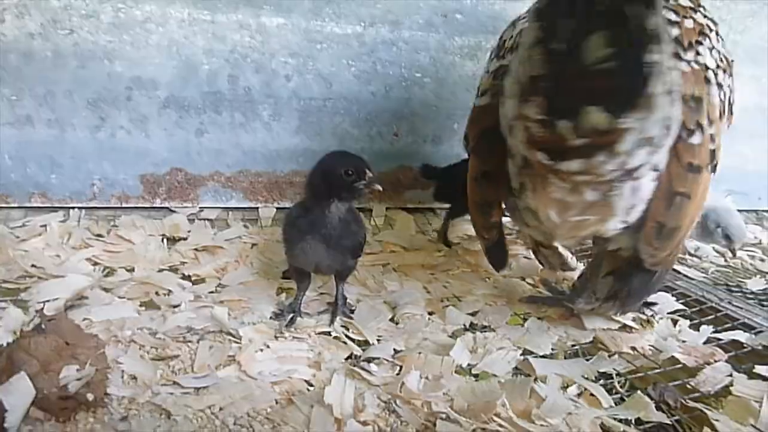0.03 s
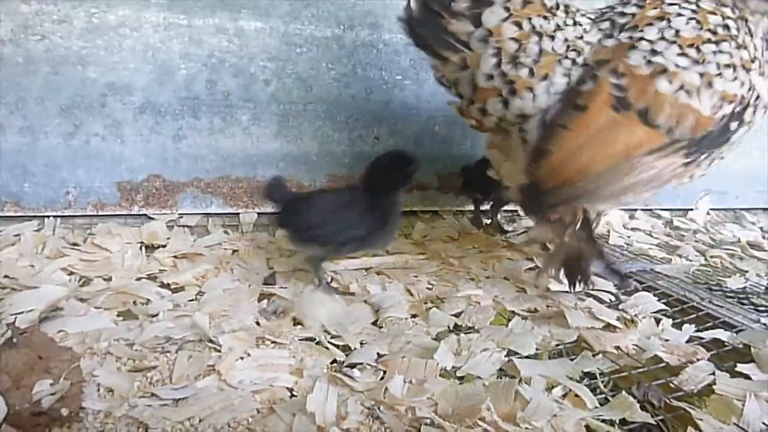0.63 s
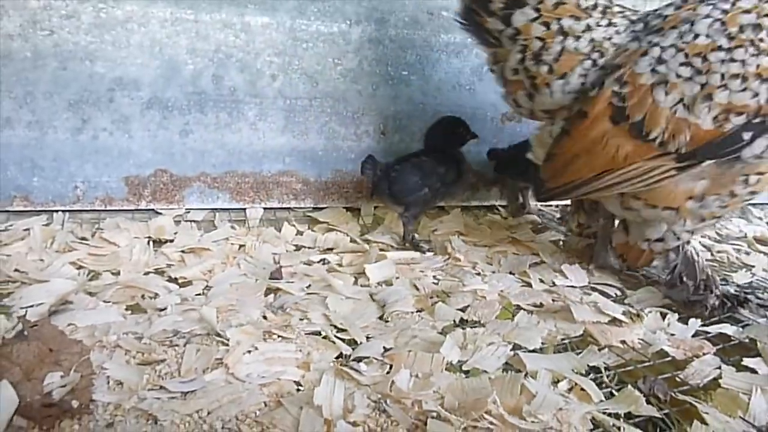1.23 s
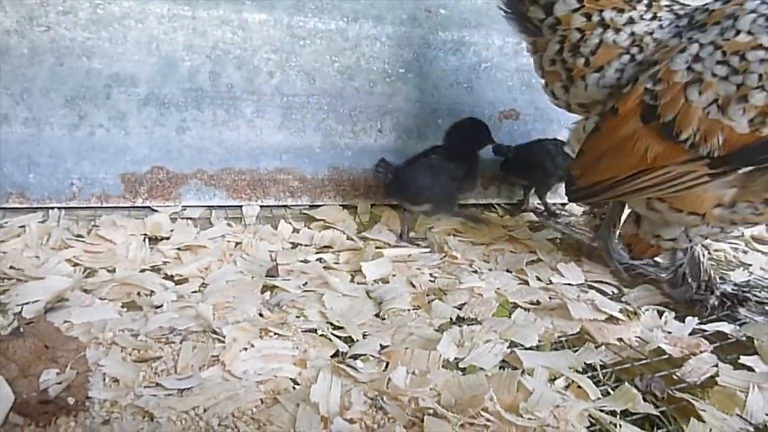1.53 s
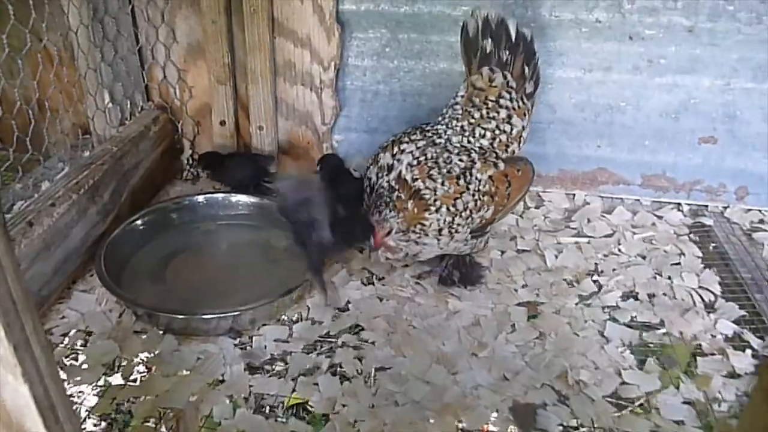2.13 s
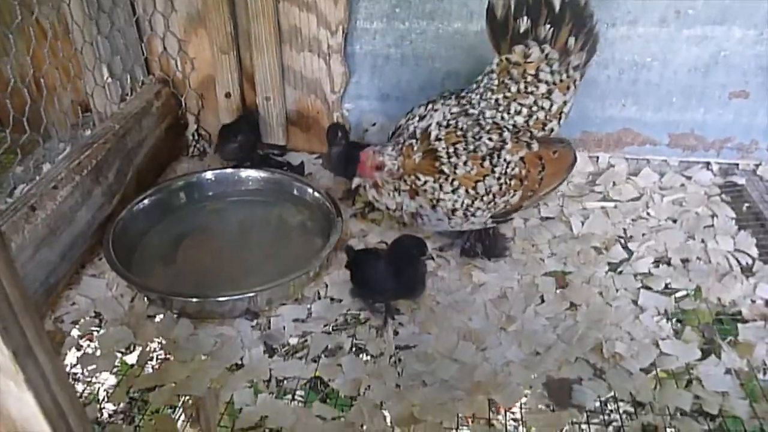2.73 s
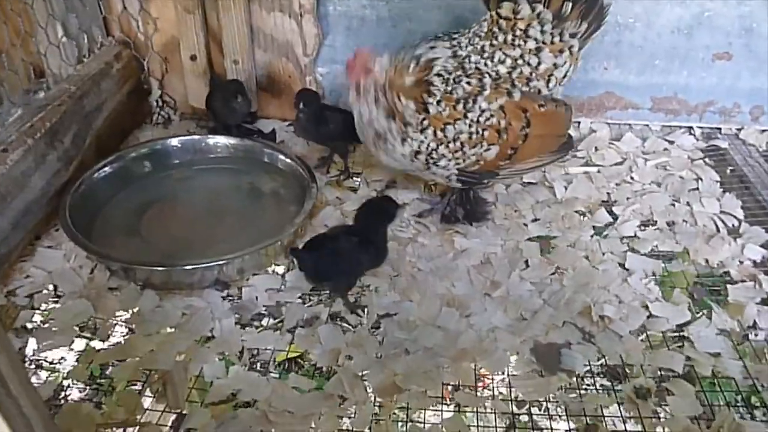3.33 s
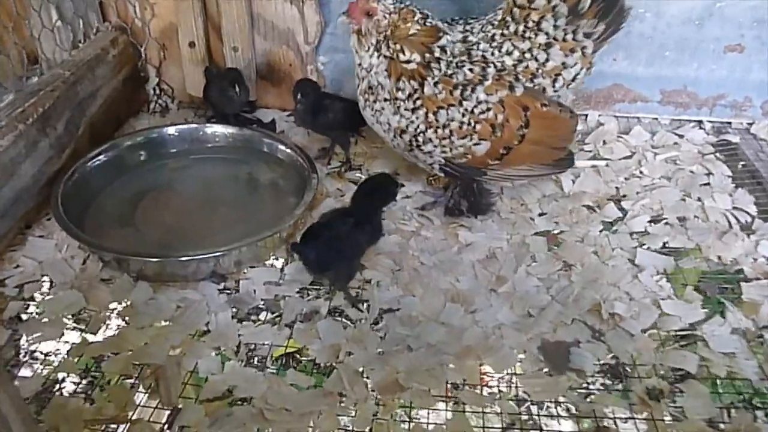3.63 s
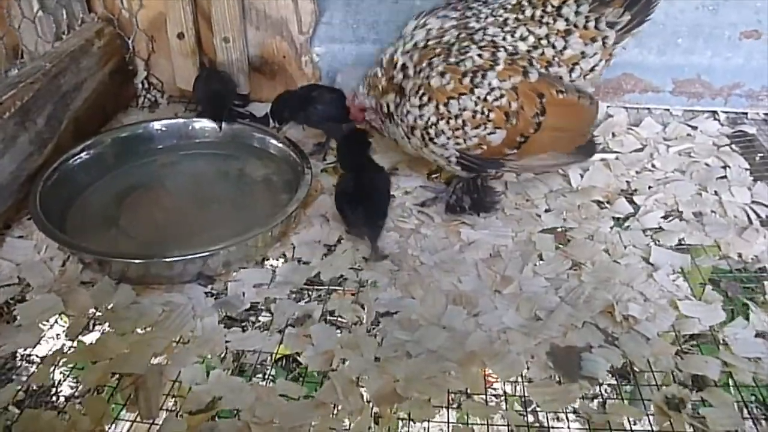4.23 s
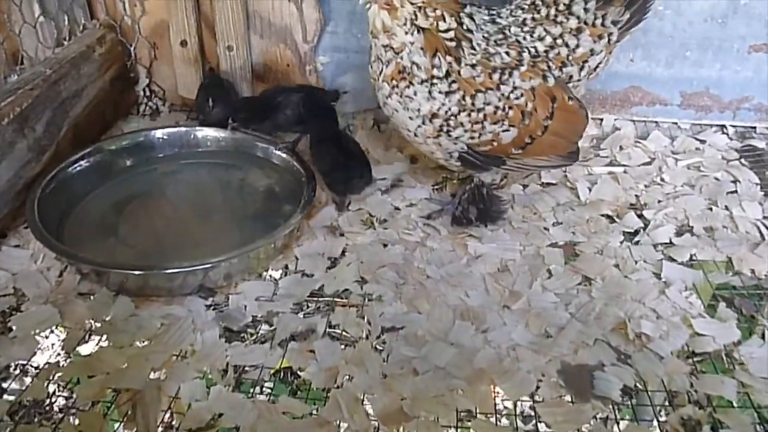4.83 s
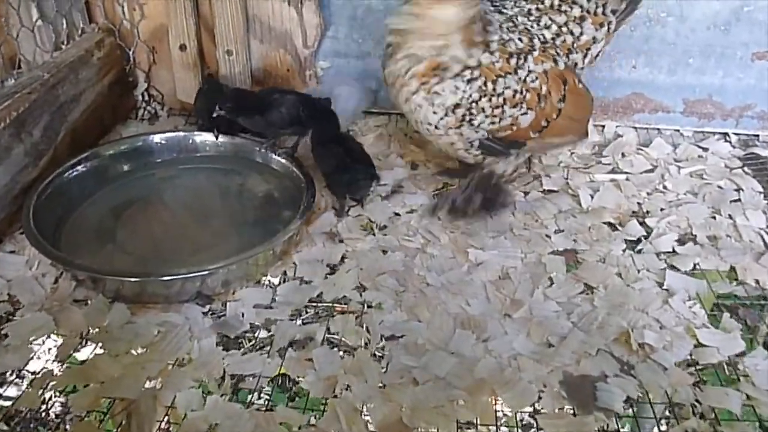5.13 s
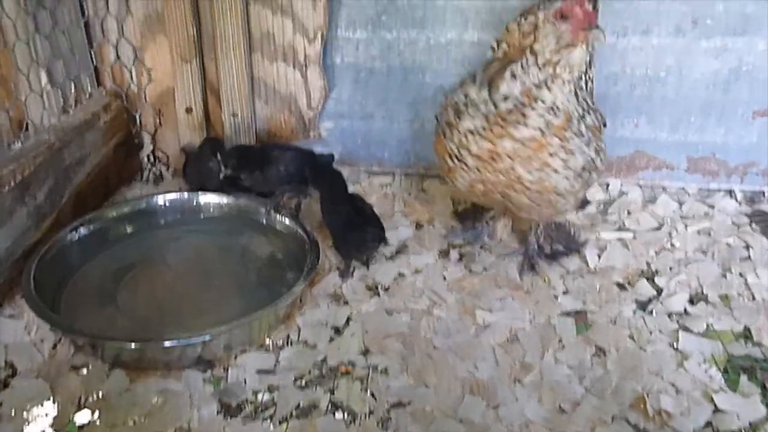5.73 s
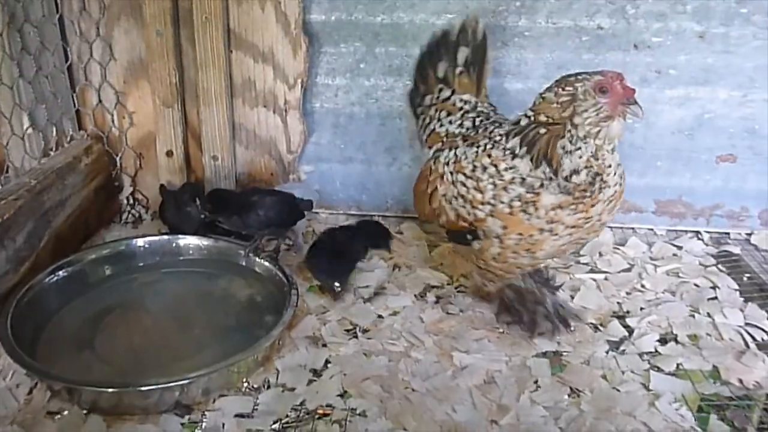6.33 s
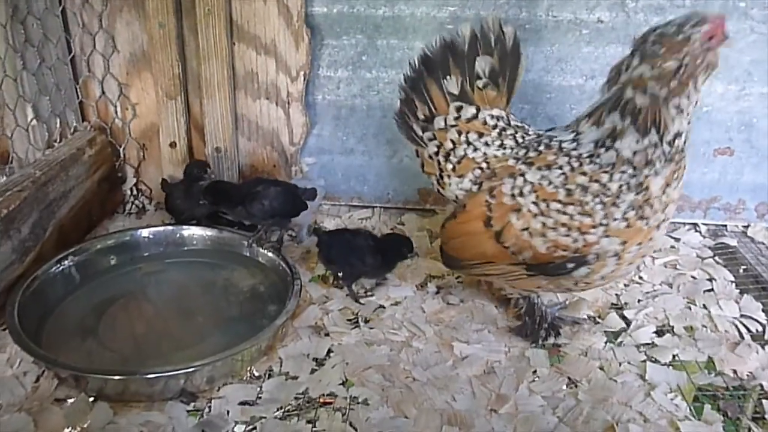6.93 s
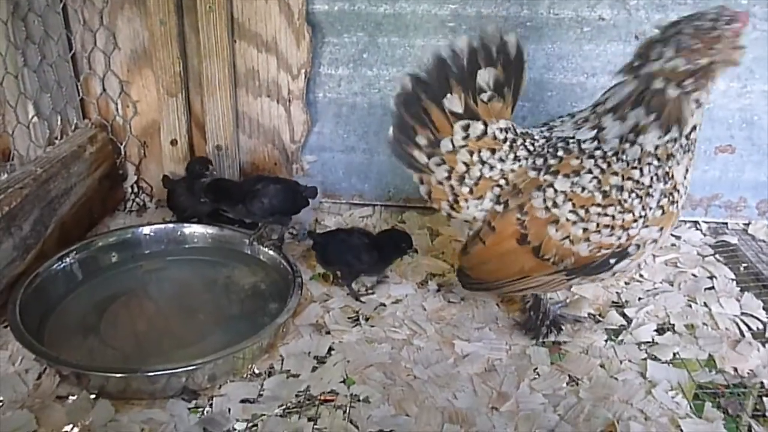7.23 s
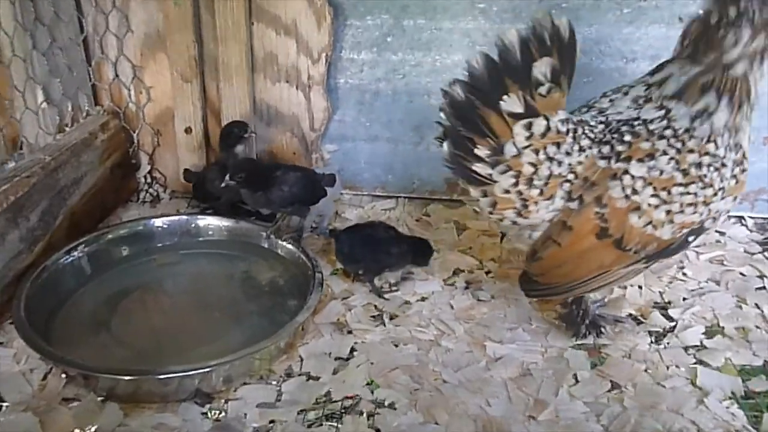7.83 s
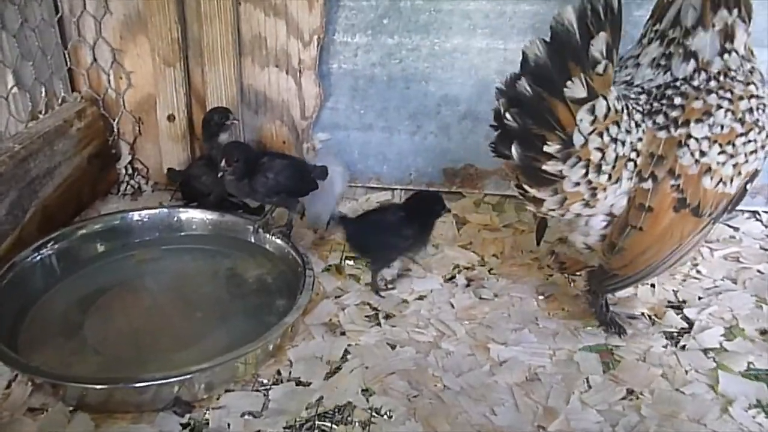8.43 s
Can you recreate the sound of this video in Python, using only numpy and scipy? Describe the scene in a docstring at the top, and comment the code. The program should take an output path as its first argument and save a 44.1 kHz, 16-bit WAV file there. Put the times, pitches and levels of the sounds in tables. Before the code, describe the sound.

Frequent thin peeps from chicks mix with a hen's brief clucks, with light crackles of wood shavings and soft background hiss.

```python
"""Chicks and a hen in a small pen of boards and sheet metal, bedded with wood shavings.
The chicks peep in falling whistles; the hen answers with short clucks, each a low grunt, then a
voiced pop. Feet crackle in the shavings and a beak taps a board, over outdoor hiss and machine hum.
Near the start all sound cuts out for half a second, then returns with slightly softer hiss."""
import sys
import numpy as np
from scipy import signal
from scipy.fft import rfft, irfft
from scipy.io import wavfile
from scipy.ndimage import uniform_filter1d

SR = 44100
rng = np.random.default_rng(int(sys.argv[2]) if len(sys.argv) > 2 else 0)


def materialize(psi):
    """Save the field psi as 16-bit PCM at rate SR to the path in sys.argv[1].

    A 1-D psi becomes a single channel; in a 2-D psi each row is a channel.
    """
    bounded = np.clip(np.atleast_2d(psi).T, -1, 1)
    quanta = np.round(bounded * 32767).astype(np.int16)
    wavfile.write(sys.argv[1], SR, quanta)


N = 382347
GAP_START_S, GAP_END_S = 1.682, 2.197

# Hen's calls, levels relative: start_s, voiced_s, pitch_hz, level_db, open_beak_octave_db,
# upper_overtones_db, half_pitch_rasp_db, pop_db, grunt_lead_s
CLUCKS = [(2.482, .017, 570, -22, -6, -17.5, -5, -23, 0.048),
          (2.896, .016, 569, -20, -2.5, -16, -8, -19, .048),
          (3.582, .017, 572, -21.5, 5, -10.5, -10, -17, .046),
          (4.076, 0.018, 595, -23, 4, -15, -13, -17, .047),
          (4.608, .017, 568, -20, 1.5, -8.5, -12, -17.5, .049),
          (5.13, 0.014, 579, -21, -11, -9.5, -5, -12.5, .049),
          (5.633, .014, 576, -19.5, -5, -11, -6, -17, .048),
          (6.216, .013, 586, -20, .5, -11, -9, -19.5, .038),
          (6.845, .011, 579, -19, -4.5, -12.5, -3, -19.5, 0.046),
          (7.534, .015, 577, -25, -1.5, -2, 2.5, -20, 0.049),
          (8.051, 0.019, 622, -27, 13, -4, -2, -24, .043)]
# Background hiss spectrum after the gap: freq_hz, density_db
LATE_HISS_SPECTRUM = [(25, -22), (50, -29), (85, -5), (125, -1), (200, -3), (400, -5), (550, -0.5),
                      (740, -5), (1050, -6), (2000, -17), (3500, -20.5), (8500, -31), (13000, -38),
                      (15500, -43)]


def undb(db):
    """Decibels to gain."""
    return 10 ** (np.asarray(db) / 20)


def level(x, db):
    """Scale to an rms level."""
    return x * undb(db) / np.sqrt(np.mean(x ** 2) + 1e-18)


def add(track, start_s, x):
    """Mix x into a track."""
    i = max(int(start_s * SR), 0)
    track[i:i + len(x)] += x[:N - i]


def ring(x, hz, width_hz):
    """One resonance, unity gain at the centre."""
    hz = min(hz, .45 * SR)
    return signal.lfilter(*signal.iirpeak(hz, hz / width_hz, fs=SR), x)


def gain_at(spectrum, hz):
    """Gain interpolated from (freq_hz, gain_db) rows."""
    freq_hz, gain_db = np.transpose(spectrum)
    return undb(np.interp(np.log(hz + 1e-9), np.log(freq_hz), gain_db))


def walk(n, rate_hz):
    """Smooth random wander, unit spread."""
    hold = max(int(SR / rate_hz), 1)
    held = np.repeat(rng.standard_normal(n // hold + 2), hold)
    return uniform_filter1d(held, hold)[:n] * np.sqrt(3 / 2)


def gate(t, length, rise, fall):
    """Rounded envelope from 0 to length."""
    opening = np.sin(np.pi / 2 * np.clip(t / rise, 0, 1))
    closing = np.sin(np.pi / 2 * np.clip((length - t) / fall, 0, 1))
    return opening * closing


def phase_of(hz):
    """Pitch curve to phase in radians."""
    return 2 * np.pi * np.cumsum(hz) / SR


def hiss(spectrum, db, waver_db=.5):
    """Shaped noise, gently wavering."""
    shape = gain_at(spectrum, np.fft.rfftfreq(N, 1 / SR))
    noise = irfft(rfft(rng.standard_normal(N)) * shape, N)
    return level(noise, db) * undb(waver_db * walk(N, 9))


def outdoor_air():
    """Hiss with a thin whine before the gap, slightly softer hiss after."""
    # Background hiss before the gap: freq_hz, density_db
    early_spectrum = [(25, -21), (50, -10), (85, -7), (130, -2), (260, -7.5), (600, -2.5), (800, -6.5),
                      (1030, -5.5), (1250, -13.5), (2100, -20), (4000, -24), (9000, -35), (13000, -36),
                      (15500, -55)]
    whine = level(ring(rng.standard_normal(N), hz=7870, width_hz=120), db=-67)
    early = hiss(early_spectrum, db=-36.5) + whine
    late = hiss(LATE_HISS_SPECTRUM, db=-38)
    return np.where(np.arange(N) / SR < GAP_START_S, early, late)


def machine_hum():
    """Distant machine: two low, drifting lines."""
    # Hum lines: pitch_hz, level_db
    lines = [(57.5, -53.5), (115, -51.5)]
    out = np.zeros(N)
    for hz, db in lines:
        tone = np.sin(phase_of(hz * (1 + .015 * walk(N, 8))))
        out += level(tone * undb(2 * walk(N, 6.3)), db)
    return out


def scratching(hz=11000, width_hz=5000):
    """Small feet keep the bedding ticking in loose bouts."""
    noise = rng.standard_normal(N)
    snap_db = 4.8 * np.minimum(walk(N, 400), 2.6)
    bout_db = 1.3 * walk(N, 5)
    snaps = noise * undb(snap_db + bout_db)
    return level(ring(ring(snaps, hz, width_hz), hz, width_hz), db=-65)


def chicks(rest_hz=3500, scoop_s=.006, waver_hz=30, crack_hz=4900, crack_bend=2.1, crack_s=.002):
    """Whistles scoop up and waver down, raspy when the other side of the syrinx joins in."""
    # Peeps, levels relative: start_s, length_s, top_hz, end_hz, bend, level_db, second_voice_db
    # bend: 1 = straight fall, 4 = held, then dropped
    peeps = [(.002, .048, 4700, 3900, 1.5, -43, -12), (.02, .062, 5150, 3700, 1.3, -36, -12),
             (.17, 0.055, 5100, 3110, 2.1, -35, -22), (.209, .046, 4380, 3230, 1.8, -39.5, -30),
             (.498, .062, 4950, 3540, 1.1, -34, -10), (.62, .062, 4580, 3520, 1.1, -38, -9),
             (.732, .061, 5050, 3490, 1.6, -36, -2), (.858, 0.078, 5220, 3070, 1.7, -38.5, -12),
             (1.152, .032, 3900, 3300, 1.5, -41, -30), (1.271, 0.035, 3810, 3230, 2.1, -42, -30),
             (1.352, .053, 5020, 3330, 1.8, -39.5, -30), (1.394, .052, 4520, 2940, 1.6, -43, -30),
             (1.503, .053, 5040, 3550, 1.4, -39, -30), (1.653, .08, 5240, 3400, 2, -44, -30),
             (2.296, .106, 4980, 3090, 2.2, -38.5, -13), (2.866, 0.035, 3490, 2560, 1.6, -42, -30),
             (3.056, .074, 4940, 3480, 1.34, -38.5, -22), (3.184, .103, 5150, 3450, 1.3, -37, -30),
             (3.362, 0.088, 5370, 3070, 2.5, -36, -30), (3.716, .139, 5470, 3320, 1.8, -40, -20),
             (3.902, .043, 3710, 3210, 1.7, -39, -30), (3.935, .098, 5380, 2900, 3.1, -32.5, -30),
             (4.025, .033, 3760, 2840, 1.9, -34.5, -30), (4.153, .04, 3920, 2910, 2.1, -31, -30),
             (4.271, .048, 3970, 3050, 2.2, -25.5, -20), (4.335, 0.15, 5170, 3050, 2.6, -35.5, -26),
             (4.416, 0.061, 4420, 3240, 2.05, -34, -25), (4.534, .052, 3880, 3130, 1.9, -36, -30),
             (4.545, 0.1, 5500, 3160, 3.8, -32, -30), (4.658, 0.048, 4180, 3160, 1.5, -37, -30),
             (4.78, 0.046, 4270, 3060, 1.6, -36, -30), (4.864, .14, 5770, 3370, 1.9, -35, -30),
             (5.079, 0.096, 5590, 3000, 3.9, -38, -30), (5.3, .049, 3960, 3310, 1.6, -39.5, -14),
             (5.352, 0.035, 3750, 2780, 2, -34, -30), (5.472, 0.037, 3810, 3150, 4, -29, -30),
             (5.493, .14, 5200, 3390, 2.2, -36.5, -30), (5.702, 0.092, 5340, 3430, 2.7, -35.5, -17),
             (5.884, 0.062, 4140, 3030, 1.5, -37, -10), (6.032, 0.066, 4200, 3050, 1.77, -39, -12),
             (6.212, .066, 4450, 3050, 2.6, -35, -20), (6.213, 0.088, 5220, 3710, 2.1, -40, -30),
             (6.437, 0.095, 5420, 3250, 2.9, -36, -30), (6.687, .065, 4370, 3450, 1.4, -36, -6),
             (6.902, .054, 4250, 3680, 1.2, -42, -15), (6.948, .03, 4420, 4480, 2, -41, -16),
             (7.08, .067, 4646, 3320, 2.9, -33, -13), (7.493, .066, 4560, 3500, 2.6, -36, -15),
             (7.682, .069, 4510, 3770, 2.4, -32.5, -15), (8.187, 0.064, 4690, 3330, 1.2, -33, -14),
             (8.23, .036, 4190, 3660, 1.7, -34, -30), (8.323, 0.071, 4460, 3090, 1.32, -37, -14),
             (8.493, 0.08, 4600, 2850, 1.9, -33, -13)]
    # Throat response, favouring the lower whistle: freq_hz, gain_db
    throat = [(2800, -3), (3700, 0), (4500, -1.5), (5600, -5.5)]
    # Beak response to the octave: freq_hz, gain_db
    beak = [(6000, -1), (7000, 4), (8000, -9), (9800, -7), (11000, 4)]
    out = np.zeros(N)
    for start_s, length_s, top_hz, end_hz, bend, db, second_db in peeps:
        n = int((length_s + .002) * SR)
        t = np.arange(n) / SR
        progress = t / length_s
        lift_hz = top_hz - rest_hz
        fall_hz = top_hz - (top_hz - end_hz) * progress ** bend
        fall_hz -= waver_hz * progress * np.sin(4 * np.pi * progress)
        scoop_hz = .85 * lift_hz * np.exp(-t / scoop_s)
        # High, held peeps crack: pitch steps down, tone turns gritty.
        strain_hz = max(top_hz - crack_hz, 0) * max(bend - crack_bend, 0)
        cracked = .5 + .5 * np.tanh((t - .72 * length_s) / crack_s)
        hz = fall_hz - scoop_hz + .4 * strain_hz * (progress ** bend - cracked * progress)
        hz *= 1 + .004 * progress * walk(n, 90)  # pitch loosens in the fall
        jitter = .005 * (progress + .5) * walk(n, 350)
        phase = phase_of(hz * (1 + jitter))
        second_ratio = .82 if start_s < GAP_START_S else 1.16
        second_hz = second_ratio * hz * (1 + .013 * walk(n, 460))
        second = np.sin(phase_of(second_hz)) * gate(progress, .87, rise=.11, fall=.31)
        rasp = undb(-3) * walk(n, 1400) * np.sin(phase)
        grit = 1 + .0003 * cracked * strain_hz * walk(n, 900)
        voice = grit * np.sin(phase) + undb(second_db) * (second + rasp)
        # A harder push raises the octave faster than the whistle.
        octave_gain = undb(-33 + .3 * (db + 38)) * (progress + .3)
        octave = octave_gain * gain_at(beak, 2 * hz) * np.sin(2 * phase)
        swell_db = .001 * lift_hz * progress
        flutter_db = 2.2 * (progress + .5) * walk(n, 140)
        envelope = gain_at(throat, hz) * undb(swell_db + flutter_db)
        envelope *= gate(t, t[-1], rise=.2 * length_s, fall=.009)
        add(out, start_s, level((voice + octave) * envelope, db))
    return out


def footsteps(grain_db=5, width_hz=6500):
    """Feet crush dry flakes: bursts of tiny, very unequal snaps."""
    # Steps in the shavings: start_s, length_s, level_db, centre_hz
    steps = [(0.277, .05, -58, 9000), (0.465, .16, -54.5, 10500), (.742, .016, -51, 12500),
             (1.07, .01, -50, 7360), (1.13, .012, -51, 8970), (1.15, .04, -59, 12000),
             (2.179, .14, -54, 10900), (2.806, .22, -62, 12500), (5.697, .31, -63, 12100),
             (6.26, 0.22, -64, 13200)]
    out = np.zeros(N)
    for start_s, length_s, db, hz in steps:
        t = np.arange(int((length_s + .004) * SR)) / SR
        snaps = rng.standard_normal(len(t)) * undb(grain_db * walk(len(t), 900))
        snaps *= gate(t, length_s, rise=length_s / 4, fall=length_s / 2)
        add(out, start_s, level(ring(ring(snaps, hz, width_hz), hz, width_hz), db))
    return out


def peck(start_s=1.1846):
    """One beak tap rings a board for a few milliseconds."""
    # Board modes: freq_hz, t60_s, level_db
    modes = [(1350, .009, -18), (2890, .011, -27), (5300, .006, -30)]
    out = np.zeros(N)
    t = np.arange(int(.04 * SR)) / SR
    for hz, t60_s, db in modes:
        add(out, start_s, undb(db - 60 * t / t60_s) * np.sin(2 * np.pi * hz * t))
    return out


def grunts(length_s=.027, pulse_hz=290, roughness=.1494):
    """The hen's throat catches with one pulse; slack pulses and turbulent air then swell and ring it."""
    # Throat resonances: centre_hz, nominal_width_hz, gain_db
    throat = [(672, 370, 6.5), (930, 250, -1.5), (1230, 75, 7), (1590, 480, -3)]
    lowpass = signal.butter(3, 1700, fs=SR, output="sos")
    out = np.zeros(N)
    t = np.arange(int(2 * length_s * SR)) / SR
    for cluck_s, *_, lead_s in CLUCKS:
        cycle = phase_of(pulse_hz * (1 + roughness * walk(len(t), 300))) // (2 * np.pi)
        pulses = level(np.diff(cycle, prepend=0), 0)
        breath = undb(-7) * rng.standard_normal(len(t))
        source = (pulses + breath) * gate(t, length_s, rise=length_s / 3, fall=.004)
        source[0] += 14  # the catch
        grunt = sum(undb(db) * ring(ring(source, hz, 1.2 * width_hz), hz, 1.2 * width_hz)
                    for hz, width_hz, db in throat)
        add(out, cluck_s - lead_s, level(signal.sosfilt(lowpass, grunt), db=-30.5))
    return out


def clucks(pop_s=.0065, pop_ratio=1.6, shimmer_db=1, rasp_db=-10, breath_db=-22):
    """The syrinx pops open, then voices; alternating strong and weak cycles add half-pitch lines."""
    # Upper overtone envelope: freq_hz, gain_db
    overtones = [(1730, 0.5), (2300, -7), (2900, -15.5), (3900, -11), (5000, -23), (8000, -33),
                 (14000, -51.5)]
    out = np.zeros(N)
    n = int(.06 * SR)
    t = np.arange(n) / SR
    since_pop_s = t - pop_s
    for start_s, length_s, pitch_hz, db, beak_db, upper_db, half_db, pop_db, _ in CLUCKS:
        progress = np.clip(since_pop_s / length_s, 0, 1.2)
        arch = .06 * (.1 - (2 * progress - 1) ** 2)
        phase = phase_of(pitch_hz * (1 + arch + .018 * walk(n, 600)))
        voice = np.sin(phase) + undb(beak_db) * np.sin(2 * phase) + undb(half_db) * np.sin(1.5 * phase)
        for k in range(5, 48):  # multiples of half the pitch
            gain = gain_at(overtones, k * pitch_hz / 2) * undb(upper_db + rasp_db * (k % 2))
            voice += gain * np.sin(k * phase / 2 + rng.uniform(0, 2 * np.pi))
        breath = ring(rng.standard_normal(n), hz=2200, width_hz=3200)
        voice += level(breath, upper_db + breath_db)
        attack = np.clip(since_pop_s / .003, 0, 1)
        release = np.exp(-np.maximum(since_pop_s - .7 * length_s, 0) / .0045)
        pressure = attack * release * undb(shimmer_db * walk(n, 447))
        pop_hz = pop_ratio * pitch_hz * (.98 + .3 * np.exp(-t / .0025))  # drops as the throat widens
        pop = np.sin(phase_of(pop_hz)) * gate(t, pop_s + .003, rise=.0025, fall=.005)
        add(out, start_s, np.sqrt(2) * (undb(db) * voice * pressure + undb(pop_db) * pop))
    return out


def hen(cutoff_hz=430):
    """Grunts and clucks; her small throat radiates little below the pitch."""
    highpass = signal.butter(4, cutoff_hz, "high", fs=SR, output="sos")
    return signal.sosfilt(highpass, undb(.5) * clucks() + grunts())


def pen_echo(x, t60_s=.08, tail_db=-10):
    """Close walls return a few echoes, which make glides flutter, and a very short tail."""
    # Floor and wall reflections: delay_s, gain_db
    echoes = [(.0013, -22.5), (.0034, -10.5), (.0059, -15), (.0093, -27.5)]
    t = np.arange(int(.2 * SR)) / SR
    tail = rng.standard_normal(len(t)) * undb(-60 * t / t60_s) * np.clip(t / .0035, 0, 1)
    response = undb(tail_db) * tail / np.linalg.norm(tail)
    for delay_s, db in echoes:
        response[int(delay_s * SR)] += undb(db)
    return signal.fftconvolve(x, response)[:N]


def scene():
    """Birds and bedding in the pen; nearly mono, with a trace of treble width."""
    small_sounds = undb(-.5) * chicks() + footsteps() + scratching() + peck()
    hen_calls = hen()
    direct = small_sounds + hen_calls
    mid = direct + outdoor_air() + pen_echo(small_sounds + undb(-4) * hen_calls) + machine_hum()
    side_hiss = hiss(LATE_HISS_SPECTRUM, db=-78.5)  # very faint stereo hiss
    side_treble = level(ring(rng.standard_normal(N), hz=4900, width_hz=9000), db=-72)
    side = side_hiss + side_treble + undb(-39) * pen_echo(direct)
    return np.array([mid + side, mid - side])


def record(dry, cutoff_hz=15700):
    """Two narrow notches and a treble cut; the sound drops out for half a second."""
    # Response dips: centre_hz, width_hz
    notches = [(1910, 140), (2405, 134)]
    sound = dry
    for hz, width_hz in notches:
        sound = sound - ring(sound, hz, width_hz)
    t = np.arange(N) / SR
    audible = (t < GAP_START_S) | (t > GAP_END_S)
    gap_gain = uniform_filter1d(audible.astype(float), size=128)
    lowpass = signal.ellip(10, .2, 80, cutoff_hz, fs=SR, output="sos")
    return signal.sosfilt(lowpass, sound * gap_gain)


dry = scene()
out = record(dry)
materialize(out)
```